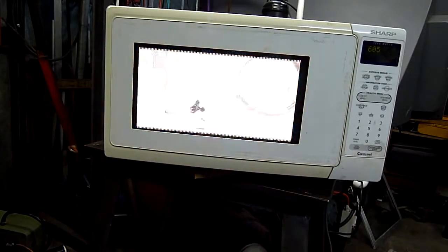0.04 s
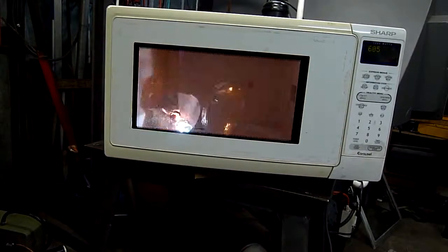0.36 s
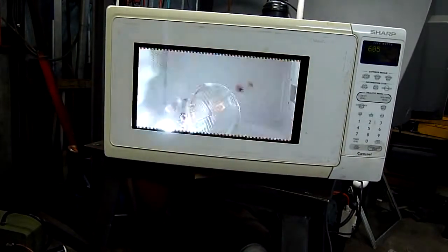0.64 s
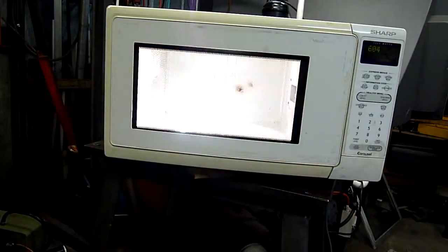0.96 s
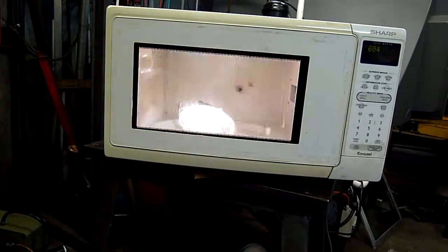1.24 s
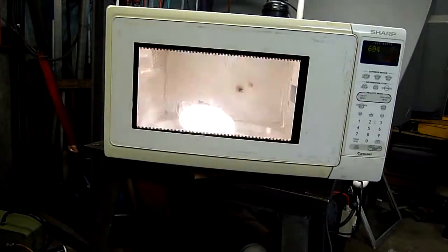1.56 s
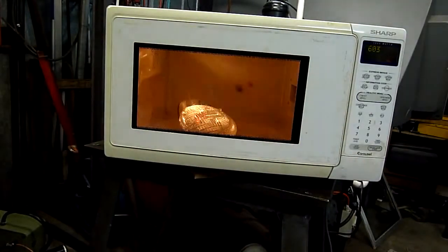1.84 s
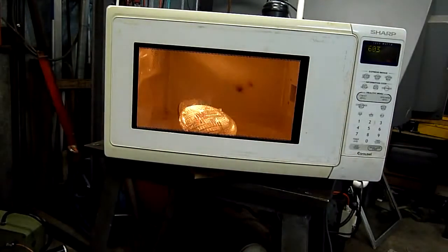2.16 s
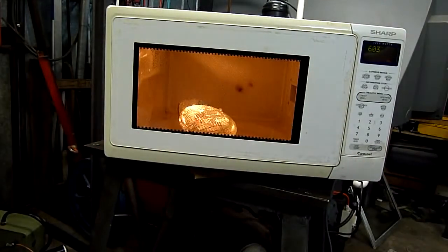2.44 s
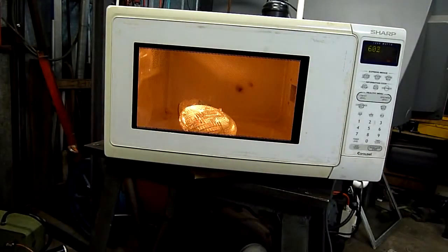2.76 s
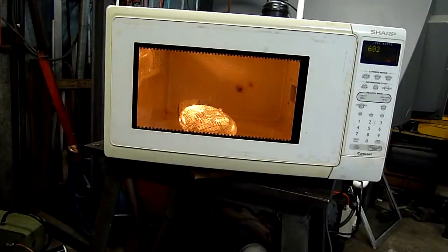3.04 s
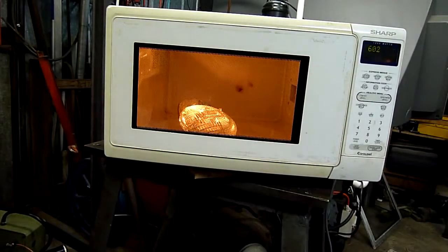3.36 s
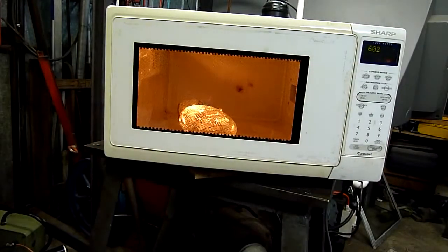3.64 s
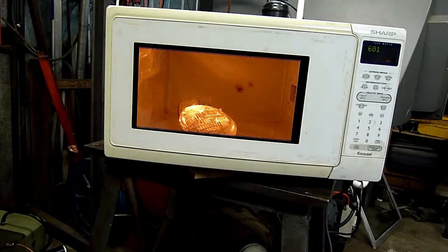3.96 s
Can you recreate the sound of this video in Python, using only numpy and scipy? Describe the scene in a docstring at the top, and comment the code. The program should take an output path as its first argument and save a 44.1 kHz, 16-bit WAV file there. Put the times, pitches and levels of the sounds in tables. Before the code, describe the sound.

A light bulb arcs inside a running microwave, heard close in a workshop. A bang opens a second of hollow, crackling flares, the glass pings, and small pops give way to a high sizzle over the hum and fan.

```python
"""A workshop, the microphone close to a running microwave oven with a headlight bulb arcing inside. A flashover
bangs, then the arc roars and flares in the steel cavity for a second, until the glass cracks with a ping. After
that the glowing bulb sizzles and spits, its plasma firing once per mains cycle, while the level of the
transformer hum and the fan, sunk low during the arcing, rises again behind it. The treble sits a little left."""
import sys
import numpy as np
from scipy import signal
from scipy.fft import rfft, irfft, next_fast_len
from scipy.io import wavfile
from scipy.ndimage import map_coordinates

SR = 44100
rng = np.random.default_rng(int(sys.argv[2]) if len(sys.argv) > 2 else 0)


def transcribe(u):
    """Save the signal u as a 16-bit wav file named by the first command-line argument.

    u: samples, shape (n,) or (channels, n), limited to [-1, 1]; the rate is SR.
    q: integer samples, one column per channel.
    """
    v = np.clip(np.atleast_2d(u).T, -1, 1)
    q = np.round(v * 32767).astype(np.int16)
    wavfile.write(sys.argv[1], SR, q)


N = 176400

MAINS_HZ = 50
TICK_ATTACK_S, TICK_HOLD_S, TICK_T60_S = 0.00033, 0.0027, 0.054
FLARE_ATTACK_S, FLARE_HOLD_S = 0.0015, 0.0093

# transformer hum: multiple of the mains, level/dB
HUM_PARTIALS = [(4, -32), (6, -36), (8, -46), (9, -50.5), (10, -46.5)]
# dip and swell of hum and fan: t/s, gain/dB
OVEN_SWELL = [(0, 0.5), (.3, -11), (1.25, -12), (1.8, -5), (2.75, 1.3)]
# noise colours of the fan air and the glowing bulb: f/Hz, relative density/dB
FAN_SPECTRUM = [(25, -16), (55, -7), (125, -10.5), (175, 2), (450, -0.5), (2200, -18.5), (15000, -20)]
SIZZLE_SPECTRUM = [(1500, -69), (3950, -3), (4600, -11.5), (5900, 2), (7100, -3.5), (9400, 0.5),
                   (12400, -2.5), (13700, -0.5), (14600, -4.5)]
SNAP_SPECTRUM = [(1000, -9.5), (1350, -4), (1520, 8), (1800, -2), (9000, -6)]
POP_SPECTRUM = [(600, -8), (1000, 11), (1300, 2), (15000, -9.5)]
# steady sizzle: t/s, gain/dB
SIZZLE_SWELL = [(1.15, -43.5), (1.75, -35.5), (2.9, -32.5), (3.0, -31.5), (3.27, -27), (3.33, -37),
                (3.45, -34), (4, -29)]
# spits of the glowing bulb: t/s, tick/dB, snap/dB
BULB_SPITS = [(1.5076, -32, -32), (1.5257, -35, -31), (1.7483, -32, -32), (1.7674, -40, -26.5),
              (1.8462, -24.5, -22.5), (1.968, -27.5, -44), (2.008, -40, -27), (2.169, -26, -44),
              (2.206, -38, -28), (2.3253, -23, -29), (2.3875, -37, -31), (2.409, -28, -46),
              (2.5498, -28.5, -29), (2.608, -28.5, -28), (2.6474, -29, -36), (2.7452, -25.5, -26),
              (2.947, -29, -40), (2.97, -28, -29.5), (2.988, -24, -32), (3.032, -34, -39),
              (3.112, -32, -29.5), (3.3488, -27, -40), (3.387, -23.5, -45), (3.566, -27.5, -41),
              (3.7297, -27.5, -35), (3.911, -23, -38), (3.9307, -22, -23.5)]
# pops of the restriking arc: t/s, level/dB
RESTRIKES = [(1.2453, -32.5), (1.366, -30.5), (1.4247, -31), (1.4681, -33.5), (1.566, -35), (1.6053, -33.5),
             (1.6704, -31.5), (1.6855, -28)]
# cracks in the glass: t/s, gain/dB, relative ring length
GLASS_CRACKS = [(0.018, -37, 1.05), (0.953, -16, 1.02), (1.03, -20.5, 0.55), (2.982, -30.5, .17)]
# ring of the glass: f/Hz, relative level/dB, t60/s
GLASS_MODES = [(2706, -10, 0.53), (4820, 5, 0.27), (6545, -20, .4), (7230, 0, 0.28), (10100, -5, 0.17)]
# pressure swing and panel ring of the flashover: f/Hz, level/dB, t60/s
BANG_MODES = [(227, -1.5, 0.036), (567, -1.5, 0.018), (821, -18, 0.23), (897, -27, 0.14), (975, -25, 0.21)]
# flares that ring hollow: t/s, f/Hz, level/dB
HOLLOW_FLARES = [(0.291, 509, -17), (.307, 2022, -20), (.653, 3610, -22.5)]
# resonances of the steel cavity: f/Hz, relative gain/dB
CAVITY_MODES = [(182, 3), (212, 1), (263, -5.5), (302, -5.5), (463, -3), (503, -0.5), (573, -6.5),
                (633, -5.5), (985, -5.5)]
# steady burn under the flares: t/s, gain/dB
BURN_SWELL = [(0, -14), (.2, -4), (.42, -4.5), (.5, -0.5), (1.06, -1), (1.2, -16.5)]
# flares of the arc, relative levels: t/s, crackle/dB, boom/dB, roar/dB, rasp/dB
ARC_FLARES = [(0.146, -18, -52, -22, -22), (0.2263, -33, -28, -26, -28), (0.2913, -23, -18.5, -20.5, -25),
              (0.3085, -22, -23, -14, -17.5), (0.3815, -24, -38, -42, -38),
              (0.4424, -50, -21.5, -20.5, -26), (0.5045, -23, -33, -39, -44),
              (0.5447, -26, -25.5, -46, -49), (0.654, -25, -19, -27, -22.5), (0.7595, -16, -21, -35, -22.5),
              (0.919, -22, -21.5, -18, -22), (0.9491, -14.5, -45, -27, -20.5),
              (1.3254, -30.5, -37, -29.5, -40)]
# the four voices of the arc: f/Hz, relative density/dB
BOOM_SPECTRUM = [(30, -45), (135, -12), (175, -4.5), (420, -3), (900, -42)]
ROAR_SPECTRUM = [(250, -52), (450, -5), (1000, -1), (1400, -7.5), (2500, -39)]
RASP_SPECTRUM = [(700, -17), (1400, -3.5), (2100, 2), (3800, -3), (5000, -9.5), (9000, -16)]
CRACKLE_SPECTRUM = [(2000, -11), (4500, 0.5), (10500, -2), (15500, -10)]
# stereo width at the microphone: f/Hz, left-right likeness (1 and above is mono)
STEREO_LIKENESS = [(30, 0.5), (170, 1.06), (2000, 0.86), (13000, 0.52)]
# stereo balance: f/Hz, left minus right/dB
LEFT_LEAN = [(1500, 0.6), (10000, 1.8)]


def amp(db):
    """Decibels to gain."""
    return 10 ** (np.asarray(db) / 20)


def clock():
    """Time of each sample in seconds."""
    return np.arange(N) / SR


def along(points, hz):
    """Interpolate (f/Hz, value) points on a log frequency axis."""
    f, values = np.transpose(points)
    return np.interp(np.log(hz + 1), np.log(f + 1), values)


def swell(points):
    """Gain at each sample along (t/s, level/dB) points."""
    return amp(np.interp(clock(), *np.transpose(points)))


def wobble(rate):
    """A smooth random curve, rate knots a second."""
    return map_coordinates(rng.standard_normal(int(N * rate / SR) + 4), [clock() * rate])


def filtered(x, response):
    """Shape x by a gain that depends on frequency."""
    size = next_fast_len(N + SR // 2)
    return irfft(rfft(x, size) * response(np.fft.rfftfreq(size, 1 / SR)), size)[..., :N]


def rush(spectrum, grain_db, ripple_db=3, ripple_hz=75):
    """Stereo noise of rms 1, clumped into grains and coloured by the dense upper modes of the box."""
    grains = rng.standard_normal((2, N)) * amp(grain_db * wobble(2000))
    knots = rng.standard_normal(SR // ripple_hz)

    def mid_side_gains(hz):
        ripple = ripple_db * np.minimum(hz / 1000, 1) * map_coordinates(knots, [hz / ripple_hz])
        spread = np.arccos(np.clip(along(STEREO_LIKENESS, hz), -1, 1)) / 2
        return amp(along(spectrum, hz) + ripple) * [np.cos(spread), np.sin(spread)]

    mid, side = filtered(grains, mid_side_gains)
    stereo = np.array([mid + side, mid - side])
    return stereo / np.sqrt(np.mean(stereo ** 2) + 1e-20)


def burst_power(starts, dbs, hold, attack, t60):
    """Summed power of attack-hold-release envelopes; times in seconds."""
    power, t = np.zeros(N + SR), np.arange(SR // 2) / SR
    for start, db in zip(starts, dbs):
        envelope = np.minimum(t / attack, 1) * amp(db - 60 * np.maximum(t - hold, 0) / t60)
        power[int(start * SR):][:len(t)] += envelope ** 2
    return power[:N]


def ring(start, modes, attack):
    """Damped sines struck at one moment."""
    t = np.arange(SR) / SR
    tone = sum(amp(db - 60 * t / t60) * np.sin(2 * np.pi * hz * t) for hz, db, t60 in modes)
    return np.pad(tone * (1 - np.exp(-t / attack)), (int(start * SR), N))[:N]


def sparks(starts, dbs, spectrum, t60=TICK_T60_S, grain_db=3.5):
    """Single dry sparks, each a sharp burst of grainy noise."""
    power = burst_power(starts, dbs, TICK_HOLD_S, TICK_ATTACK_S, t60)
    return np.sqrt(power) * rush(spectrum, grain_db)


def oven(fan_db=-40):
    """The background: the transformer hums on mains harmonics and the cooling fan moves air."""
    hum = np.zeros(N)
    for harmonic, db in HUM_PARTIALS:
        phase = 2 * np.pi * (harmonic * MAINS_HZ * clock() + rng.random())
        hum += amp(db) * np.sin(phase + 0.16 * wobble(6.38))
    fan = amp(fan_db) * rush(FAN_SPECTRUM, grain_db=0.5)
    return swell(OVEN_SWELL) * (hum + fan)


def sizzle(offset_s=0.0063, scatter_s=0.0011, scatter_db=2.54, feed_db=-6.5):
    """The plasma fires once per mains cycle; each spit ticks, snaps and feeds the next few firings."""
    starts, tick_db, snap_db = np.transpose(BULB_SPITS)
    cycles = np.arange(N * MAINS_HZ // SR) / MAINS_HZ + offset_s
    late, size = rng.standard_normal((len(cycles), 2)).T
    firing_times = np.abs(cycles + scatter_s * late)
    firing = burst_power(firing_times, scatter_db * size, TICK_HOLD_S, attack=0.0014, t60=0.12)
    fed = burst_power(starts, tick_db + feed_db, hold=1 / MAINS_HZ, attack=1 / MAINS_HZ, t60=0.37)
    hiss = np.sqrt(firing * (swell(SIZZLE_SWELL) ** 2 + fed)) * rush(SIZZLE_SPECTRUM, grain_db=3)
    snaps = sparks(starts, snap_db, SNAP_SPECTRUM, t60=0.12, grain_db=2.5)
    return hiss + snaps + sparks(starts, tick_db, SIZZLE_SPECTRUM)


def sputter():
    """Before the glow settles, the arc restrikes with small hollow pops."""
    starts, dbs = np.transpose(RESTRIKES)
    return sparks(starts, dbs, POP_SPECTRUM)


def glass(beat_hz=62, twin_db=-5, rough_db=2.2, jitter_rad=0.5):
    """The bulb rings roughly each time the heat cracks it; every mode beats with a lower twin."""
    pings = np.zeros(N)
    for hz, db, t60 in GLASS_MODES:
        tone = np.zeros(N)
        for start, crack_db, length in GLASS_CRACKS:
            pair = [(hz, db, t60 * length), (hz - beat_hz, db + twin_db, t60 * length)]
            tone += amp(crack_db) * ring(start, pair, attack=0.002)
        roughness = amp(rough_db * wobble(110))
        phase_jitter = np.exp(1j * jitter_rad * wobble(120))
        pings += (signal.hilbert(tone) * roughness * phase_jitter).real
    return pings


def flashover(start_s=0.0157, crack_db=-7):
    """One discharge: a sharp bang with a crack on top; the recorder's low cut removes the deep bass."""
    power = burst_power([start_s], [crack_db], hold=0.0013, attack=0.00012, t60=0.049)
    crack = np.sqrt(power) * rush([(1200, 6.5), (3500, -9.5), (9000, -7.5), (15000, -11)], grain_db=0.5)
    bang = ring(start_s, BANG_MODES, attack=0.0001) + crack
    return signal.sosfilt(signal.butter(3, 150, "highpass", fs=SR, output="sos"), bang)


def howls(relative_width=0.16):
    """Some flares bark or sing briefly in one broad resonance."""
    barks = np.zeros(N)
    for start, hz, db in HOLLOW_FLARES:
        flutter = wobble(relative_width * hz) + 1j * wobble(relative_width * hz)
        band = (flutter * np.exp(2j * np.pi * hz * clock())).real
        barks += np.sqrt(burst_power([start], [db], FLARE_HOLD_S, FLARE_ATTACK_S, t60=0.13)) * band
    return barks


def cavity(x, width_hz=13.8, direct_gain=0.5, ring_gain=1.38):
    """The direct sound reaches the microphone together with the ring of the steel box."""
    def response(f):
        damping = 1j * f * width_hz
        modes = sum(amp(db) * damping / (hz ** 2 - f ** 2 + damping) for hz, db in CAVITY_MODES)
        return direct_gain + ring_gain * modes

    return filtered(x, response)


def arc(flicker_db=2.5):
    """Up front, a steady burn with flares that each open with a spark; boom and roar ring the cavity."""
    starts, crackle_db, boom_db, roar_db, rasp_db = np.transpose(ARC_FLARES)
    burn = swell(BURN_SWELL)
    flicker = amp(flicker_db * wobble(2 * MAINS_HZ))

    def voice(spectrum, dbs, burn_db, t60, grain_db):
        flares = burst_power(starts, dbs, FLARE_HOLD_S, FLARE_ATTACK_S, t60)
        return np.sqrt(flares + (amp(burn_db) * burn) ** 2) * rush(spectrum, grain_db)

    boom = voice(BOOM_SPECTRUM, boom_db, burn_db=-28, t60=0.24, grain_db=1)
    roar = voice(ROAR_SPECTRUM, roar_db, burn_db=-25, t60=0.19, grain_db=1.5)
    rasp = voice(RASP_SPECTRUM, rasp_db, burn_db=-28, t60=0.19, grain_db=1.5)
    crackle = voice(CRACKLE_SPECTRUM, crackle_db - 3.5, burn_db=-30.5, t60=0.18, grain_db=3.5)
    return cavity(boom + roar) + rasp + flicker * crackle + sparks(starts, crackle_db, CRACKLE_SPECTRUM)


def scene():
    """All sources as they meet at the microphone; the treble leans to the left."""
    mix = oven() + flashover() + arc() + howls() + glass() + sputter() + sizzle()
    half_each_side = np.array([[0.5], [-0.5]])
    return filtered(mix, lambda hz: amp(along(LEFT_LEAN, hz) * half_each_side))


def record(dry):
    """The recorder clips at full scale and keeps nothing above its band limit."""
    return filtered(np.clip(dry, -1, 1), lambda hz: hz < 15800)


dry = scene()
out = record(dry)
transcribe(out)
```